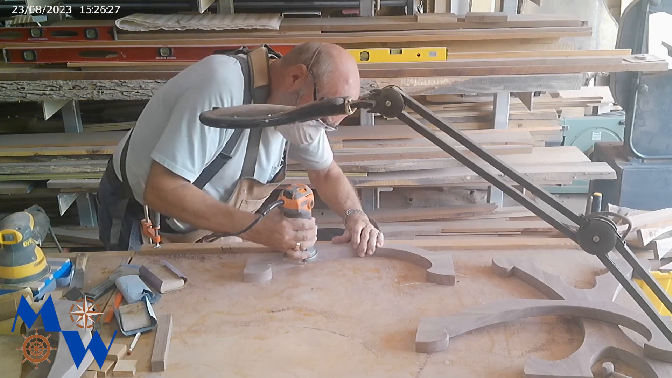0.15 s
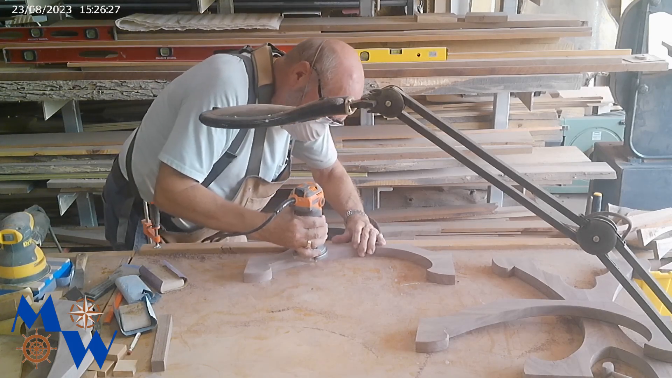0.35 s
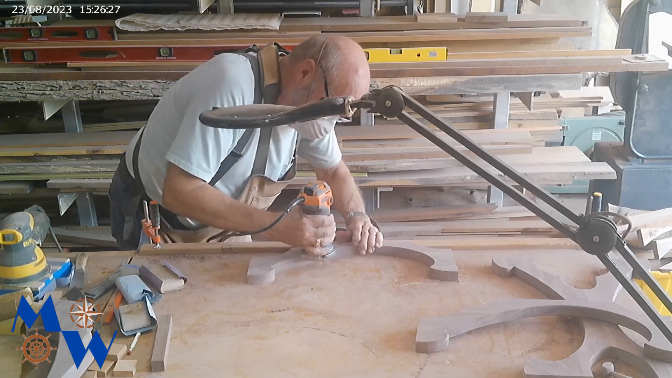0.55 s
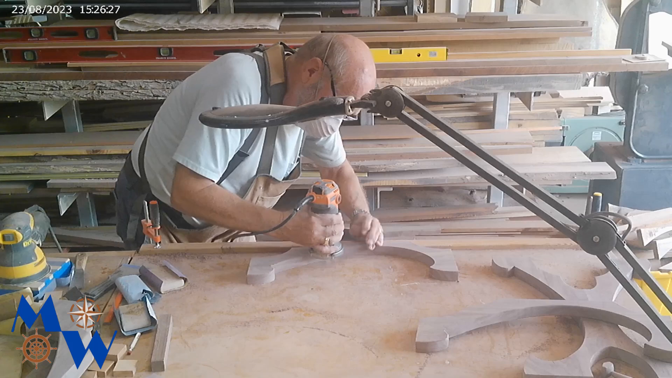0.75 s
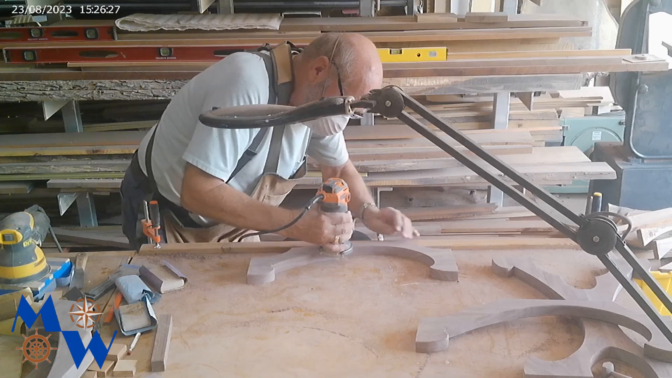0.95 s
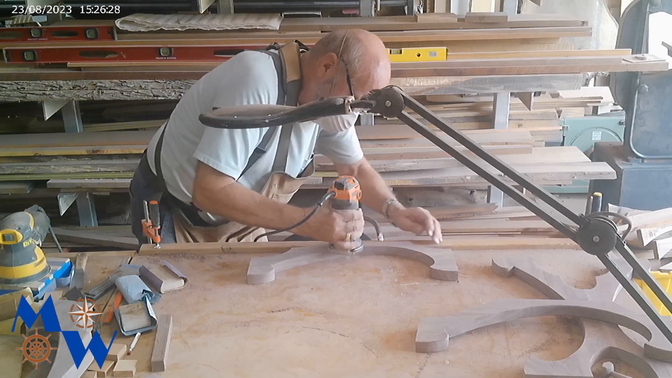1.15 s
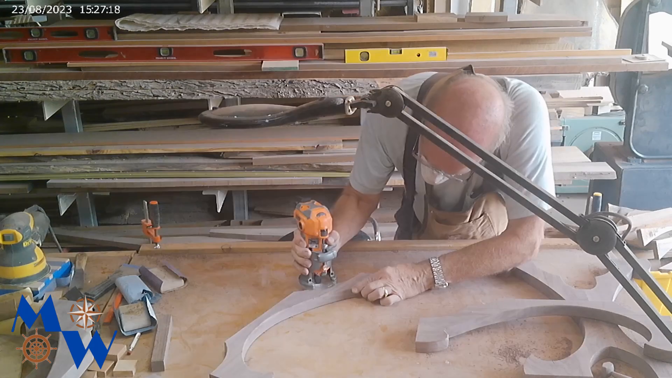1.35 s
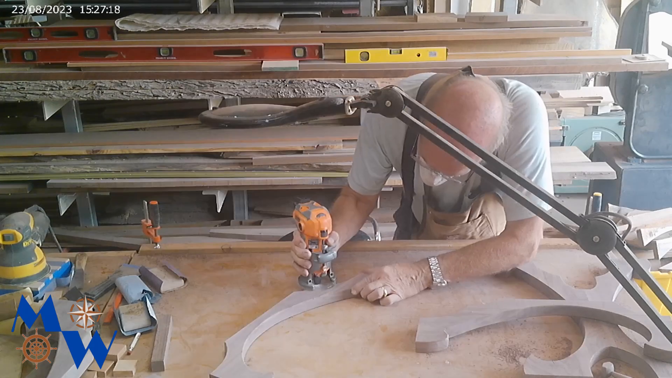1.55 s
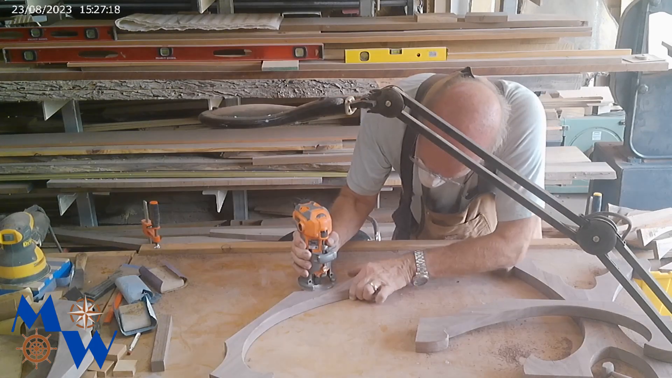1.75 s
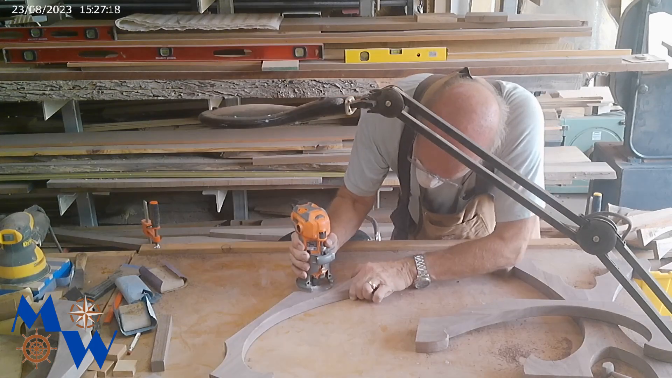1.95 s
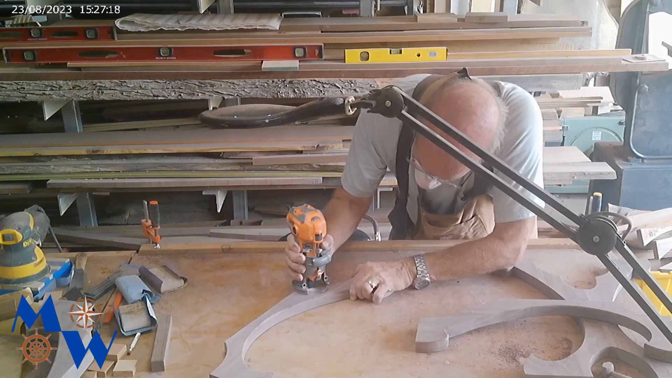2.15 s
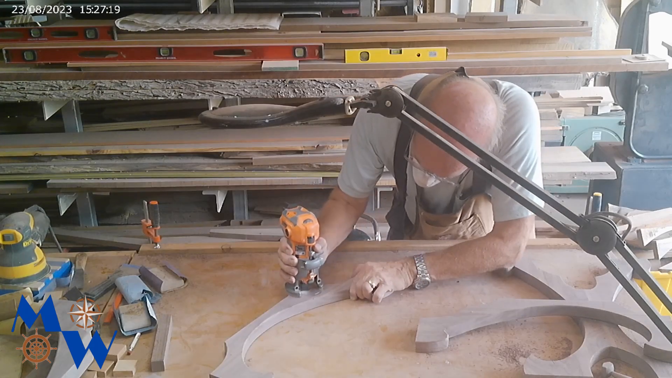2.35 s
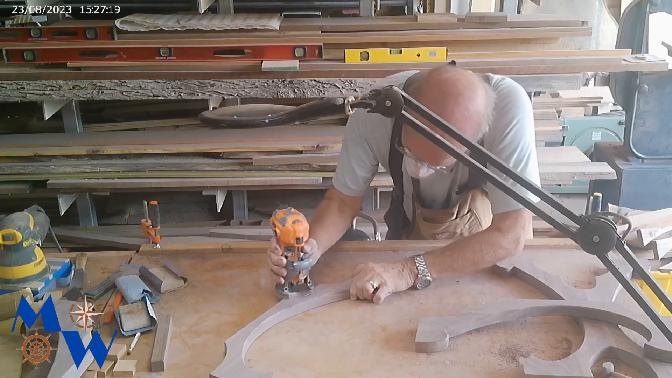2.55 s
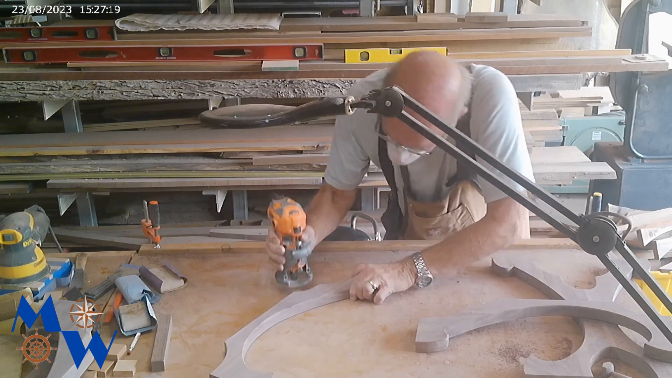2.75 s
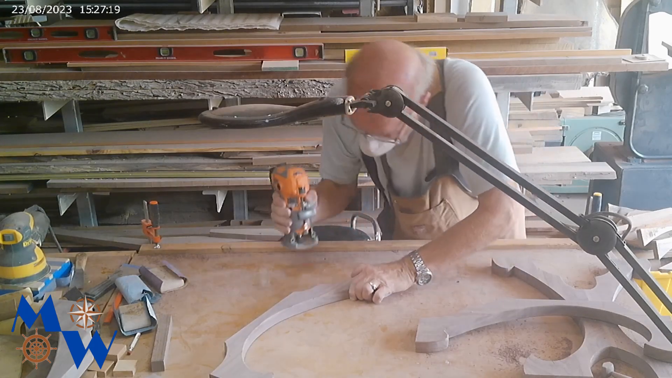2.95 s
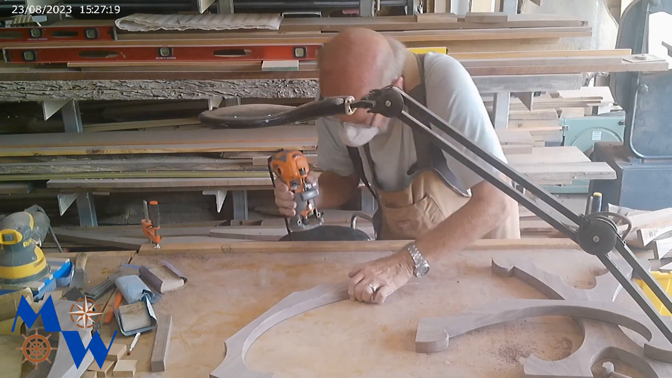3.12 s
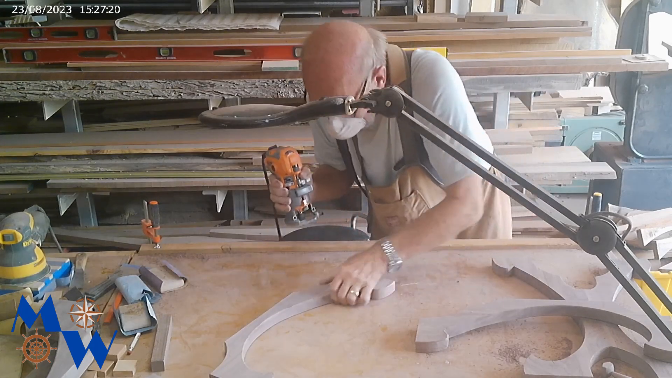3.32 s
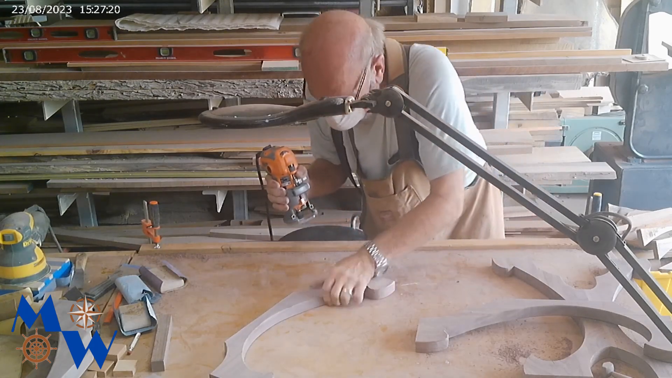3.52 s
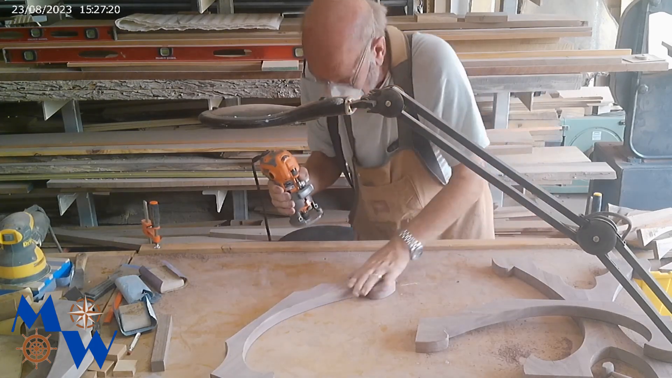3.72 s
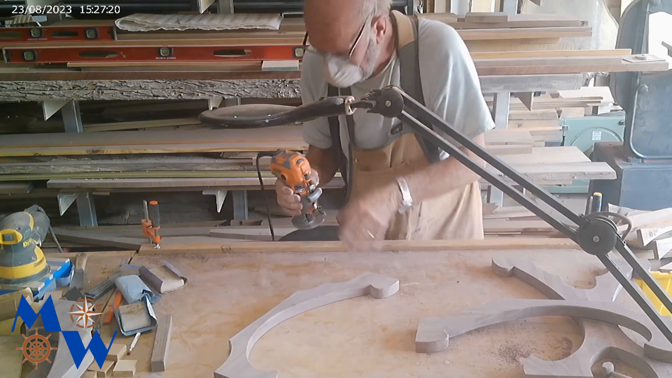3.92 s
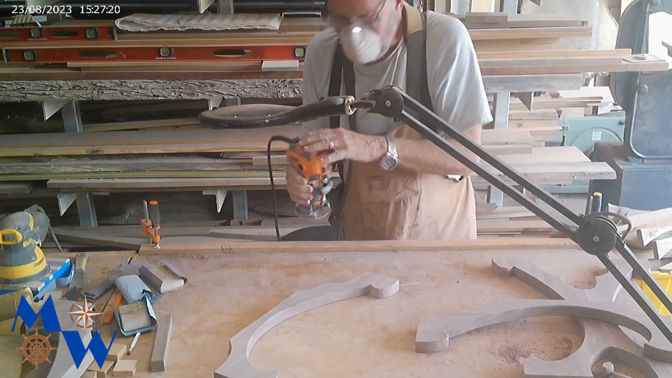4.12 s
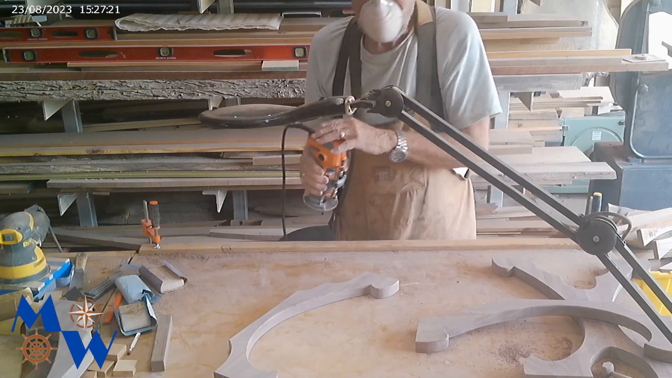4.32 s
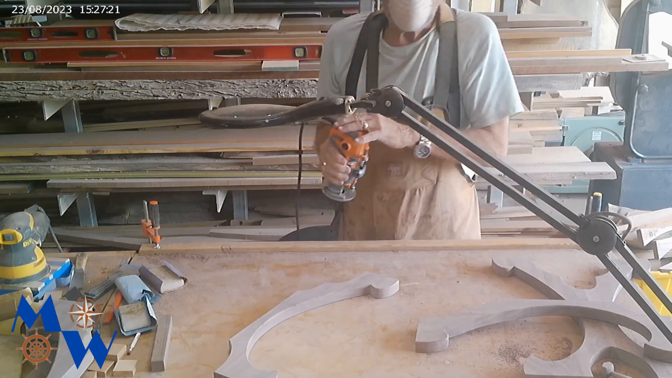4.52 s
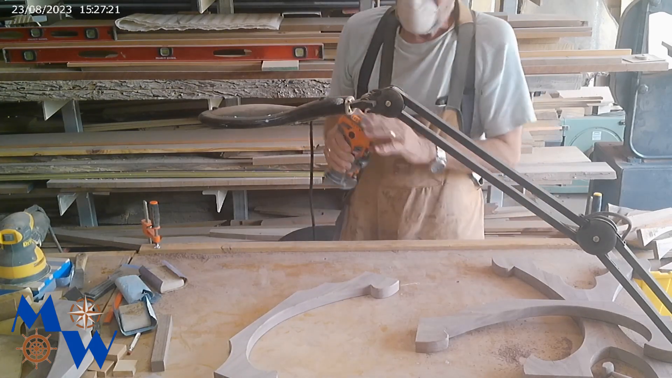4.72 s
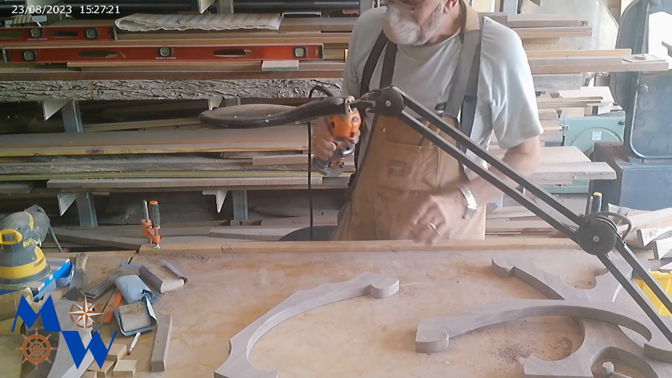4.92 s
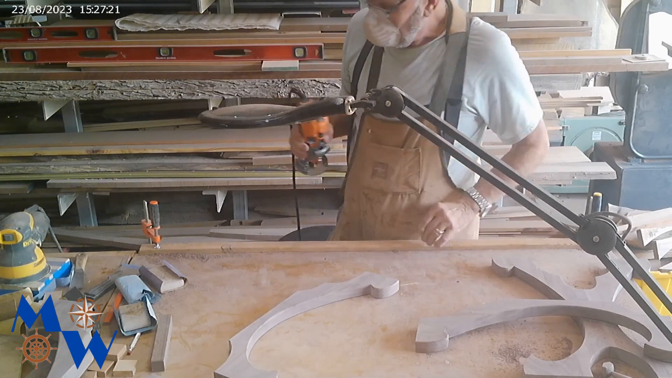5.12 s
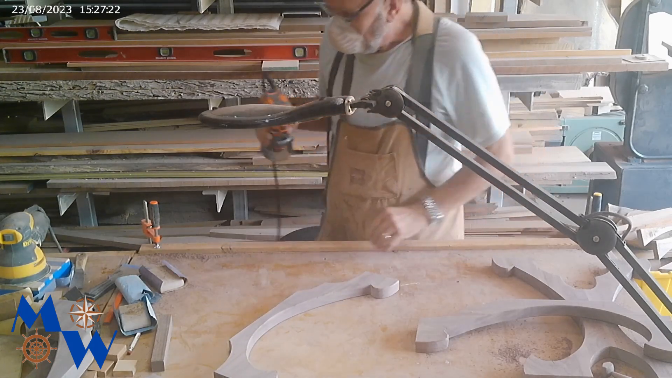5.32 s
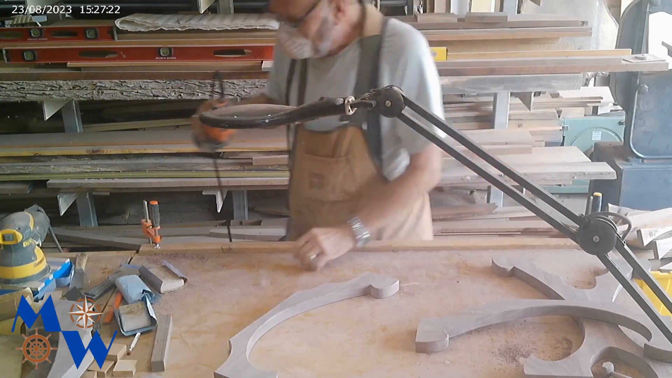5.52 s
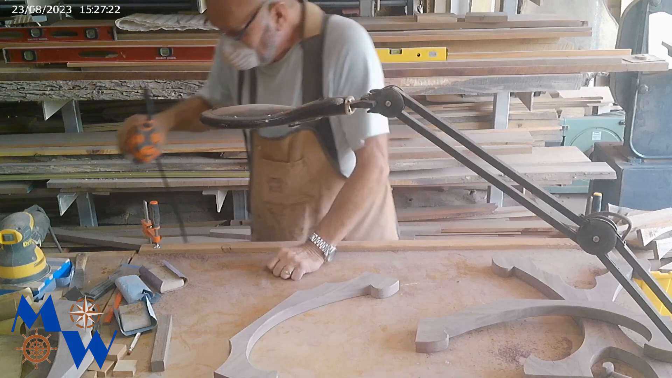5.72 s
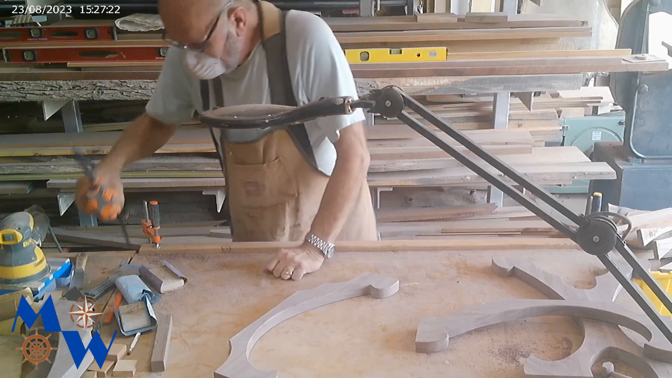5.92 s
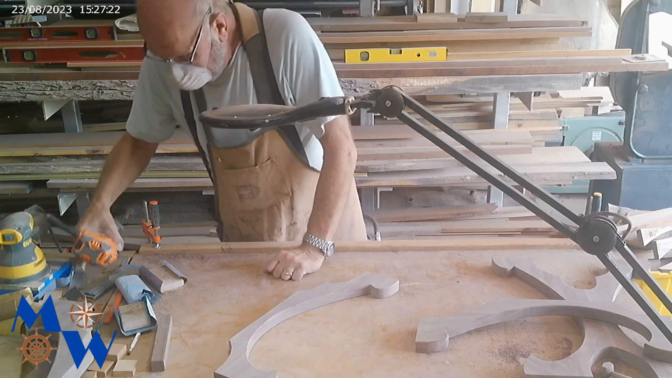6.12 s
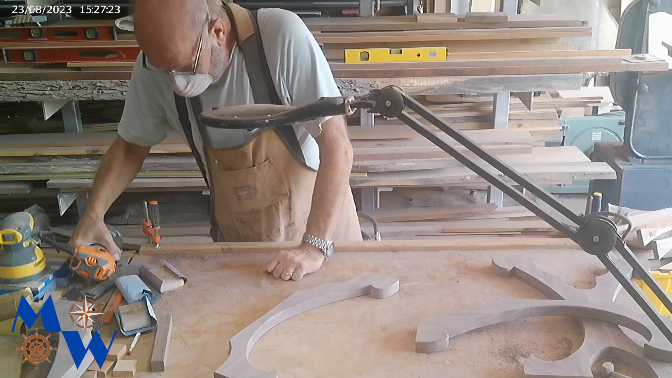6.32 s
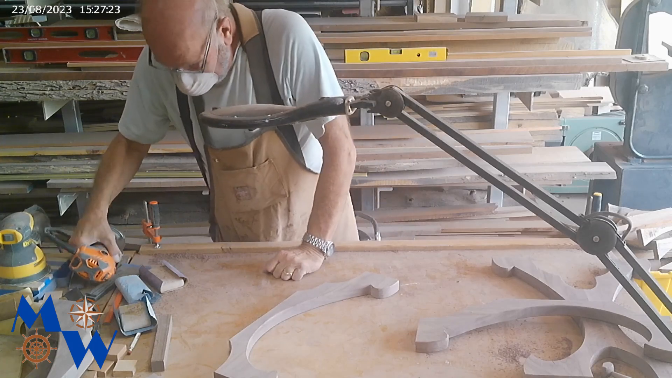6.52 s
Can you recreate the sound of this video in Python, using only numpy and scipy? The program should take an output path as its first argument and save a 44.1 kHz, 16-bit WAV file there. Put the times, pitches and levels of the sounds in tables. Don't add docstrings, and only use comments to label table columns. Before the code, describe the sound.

Close recording in a lightly echoing workshop: a handheld router bites a wooden edge with buzzing, wavering tones over broad airy hiss. After a sudden cut it hovers, bites again and sags slightly in pitch, then comes off the wood into a cleaner fluctuating whistle. Power goes off, the motor coasts downward with dry brush chatter, and the tool bumps down. The treble is slightly grainy.

```python
import sys
import numpy as np
from scipy import signal
from scipy.fft import rfft, irfft, next_fast_len
from scipy.io import wavfile
from scipy.ndimage import uniform_filter1d, map_coordinates

SR = 44100
rng = np.random.default_rng(int(sys.argv[2]) if len(sys.argv) > 2 else 0)


def how_loud(loudness_db):
    steps = np.asarray(loudness_db, float) / 20
    return 10 ** steps


def master(y):
    cut = np.clip(np.atleast_2d(y).T, -1, 1)
    pcm = np.round(cut * 32767)
    wavfile.write(sys.argv[1], SR, pcm.astype(np.int16))


N = 294140
CHANGE_S, CLEAR_S = 1.254, 2.645

# pitch_hz, level_db
GARAGE = [(12, -29), (20, -2), (70, 3.5), (109, 0.5), (168, -14.5), (219, -8), (272, -21), (431, -10.5),
          (729, -26), (800, -3), (1040, -21.5), (1760, -120)]
# pitch_hz, level_db
HISS = [(3000, -38.5), (7500, -3), (10000, 4), (12500, -9), (15800, -4)]
# pitch_hz, ring_s (time to fall 60 dB)
WALLS = [(200, 0.81), (2000, 0.43), (10000, 0.15)]
# pitch_hz, step_db
COARSE = [(300, -4), (3500, 3), (4600, 5), (5500, 5), (6900, 9), (7800, 13), (8800, 13.5), (9150, 17),
          (9600, 12), (11000, 12.5), (12300, 13), (12700, 15.5), (13500, 15), (14400, 15.5), (14800, 17.5),
          (15200, 17.5), (15500, 14)]

# start_s, level_db, upper_share
KNOCKS = [
    (.499, -32, 0.99),
    (0.547, -34, 0.36),
    (6.575, -41, 1.1),
    (6.646, -37, 0.77),
]
# pitch_hz, ring_s (time to fall 60 dB)
FRAME = [(62, .16), (105, 0.12)]
# start_s, length_s, thud_db, buzz_db
PRESSES = [(0.497, 0.025, -67, -38), (0.525, 0.14, -62, -54), (1.58, 0.14, -67, -55),
           (1.765, 0.72, -65.5, -53), (2.15, 0.28, -81, -53), (2.502, 0.09, -75, -49),
           (3.776, 0.096, -54.5, -54.5), (5.922, 0.059, -65, -67), (6.102, 0.028, -52, -52),
           (6.133, 0.042, -55.5, -54.5), (6.355, 0.12, -52, -49.5), (6.482, 0.069, -55, -55.5),
           (6.56, 0.07, -49, -47.5), (6.638, .06, -50, -50)]
# pitch_hz, level_db
THUD = [(25, -34), (45, 20.5), (70, 2), (110, 10.5), (160, -17), (250, -39), (2000, -120)]
# pitch_hz, level_db
BUZZ = [(100, -61), (150, -6), (230, -2), (330, -4), (450, -6), (800, -15), (1500, -64), (4000, -120)]

# time_s, turns_hz
SPEED = [(0, 456.8), (.21, 455.6), (.63, 454.2), (1.04, 453.3), (1.253, 454.4), (1.255, 461.5),
         (1.45, 463.2), (1.65, 463.3), (1.85, 460.6), (2.45, 453.2), (2.62, 453), (2.85, 459.7),
         (3.05, 461.9), (3.25, 463.1), (3.65, 464.1), (4.47, 464)]
# start_s, changeover_s
STANCES = [
    (0, 0),
    (1.254, .002),
    (1.66, .1),
    (2.62, .04),
    (2.85, .2),
]
HELD = {"shaft": ([-54.5, -39, -49, -42.5, -47], 4.5), "second": ([-44.5, -38, -32, -38, -45.5], 8),
        "bars": ([-52.5, -45, -46, -48.5, -49.5], 0.056), "collet": ([-35, -60, -46, -45, -32], 6.2),
        "base": ([-33.5, -32.5, -31.5, -32, -38], 1.92), "chips": ([-34, -44, -39, -46, -60], 2.7),
        "raised": ([-59, -57, -60, -49.5, -38], 3.3), "housing": ([-26.5, -26, -27, -27, -26.5], 2.52),
        "fan": ([-36, -28, -29, -26.5, -29.5], 2.9), "brush": ([-42, -37, -38, -37, -39], 2.6)}

# pitch_hz, level_db
BASE = [(290, -37.5), (500, -13), (528, -18.5), (739, -7), (946, -1), (1200, 1.5), (1310, 4), (1800, -11.5),
        (2340, -41), (3960, -120)]
# pitch_hz, level_db
HOUSING = [(880, -28), (1380, -14), (1550, -6), (2300, -2.5), (2750, -5), (3110, -5), (3420, -2.5),
           (3850, -10), (4150, -9), (4450, -11.5), (4750, -8.5), (5000, -3), (6370, -5.5), (10800, -120)]
# pitch_hz, level_db
FAN = [(2530, -43), (4300, -3.5), (4500, -20), (4860, -19.5), (5370, -1), (5680, -3.5), (6170, -5),
       (6930, -5), (8180, -19), (9100, -19), (11800, -50.5), (20000, -120)]
# pitch_hz, level_db
BRUSH = [(5350, -60), (9100, -10.5), (9860, 1.5), (10700, -4), (11300, -5.5), (12200, -4), (12500, -13),
         (12900, -12), (13500, -10.5), (14300, -12.5), (14650, -16), (15050, -17), (15400, -14),
         (15700, -8)]
# pitch_hz, level_db
COLLET = [(1300, -37.5), (1800, -6.5), (2100, 1), (2450, 2.5), (2800, -11), (3100, -20), (3450, -9),
          (3800, -28.5), (4500, -46)]
# time_s, level_db
OPENING = [(2.8, -1.5), (3.02, 1.5), (3.2, 1), (3.5, 1.5), (3.85, -1), (3.95, -3), (4.25, -11.5),
           (4.4, -3.5), (4.6, 2.5), (5.1, -9.5), (5.55, 14), (5.7, -5)]
# pitch_hz, level_db
RAISED = [(700, -37.5), (950, -11), (1110, 2), (1230, -5), (1370, -17.5), (1550, -5.5), (1680, -3.5),
          (1850, -1), (2000, -8.5), (2600, -39.5)]
# pitch_hz, level_db
CHIPS = [(900, -39.5), (1300, -10), (1500, 0), (1700, -5.5), (2300, -40)]
# time_s, level_db
HOLLOW = [(4.6, -50), (5, -43.5), (5.3, -45.5), (5.6, -44), (5.85, -48), (5.97, -55), (6.1, -53.5),
          (6.35, -56), (6.67, -66)]
# pitch_hz, level_db
CAVITY = [(400, -39), (620, -13), (780, -15), (860, 4.5), (930, -2.5), (1000, -0.5), (1150, -7),
          (1600, -54)]
# pitch_hz, width_hz, middle_s, length_s, level_db
POISED = [
    (1693, 34, 1.6, 0.86, -40),
    (2070, 46, 4.2, 0.65, -38),
    (1290, 38, 1.6, 0.088, -35),
    (860, 28, 5.93, 0.98, -57.5),
    (1000, 23, 6.2, 0.4, -59),
]

# time_s, level_db
COAST = [(4.4, -70), (4.85, -47), (5.1, -45), (5.4, -52), (5.8, -48), (6.2, -48.5), (6.67, -48.5)]
PROUD_DB = {24: -20, 29: -6, 39: 5, 17: 4, 19: 4, 26: 5, 31: 4, 33: 4, 36: 4, 43: 5, 48: 5}
# pitch_hz, level_db
COWL = [(1200, -39), (2500, -10), (3700, -7), (4250, 0), (4900, -7), (5800, 1), (7200, -10), (8500, -16),
        (10000, -10), (12000, -18), (15000, -35)]
# multiple, middle_s, length_s, level_db
SQUEAL = [(16, 5.02, .16, -38), (17, 5.82, .12, -53), (18, 6.1, .06, -55), (12, 5.1, .2, -46),
          (24, 5.87, .13, -49), (24, 6.04, .15, -57), (24, 6.18, .09, -45), (24, 6.28, .14, -53),
          (24, 6.48, .15, -52.5), (24, 6.63, .12, -57), (29, 5.9, .16, -55), (29, 6.13, .2, -54),
          (29, 6.42, .09, -51), (31, 6.48, .09, -54), (33, 6.05, .05, -56), (35, 6.61, .11, -52.5),
          (26, 5.98, .1, -55), (21, 5.62, .12, -51), (39, 6.35, .2, -59), (42, 6.46, .08, -57)]

# time_s, level_db
BITE = [(0, 6), (.3, -0.5), (.6, 4), (.9, 5.5), (1.1, -1), (1.253, 10), (1.255, -17), (1.6, -22), (1.7, -5),
        (2, 2.5), (2.3, 5), (2.6, 1.5), (2.67, -5), (2.75, -75), (6.67, -37)]
# multiple, level_db
CUTTER = [(1, -11), (2, -7), (3, -14.5), (4, -5.5), (5, -11), (6, -8), (7, 0), (8, 2), (9, -6), (10, -8),
          (11, -13.5), (12, -6), (13, -3), (14, -10), (15, -11), (16, -19.5), (17, -80), (18, -27),
          (19, -29.5), (20, -53), (21, -27), (22, -23.5), (23, -66), (24, -26), (25, -30), (26, -41),
          (27, -44.5)]
SWELLS = {1: [(0, 0.096, -31.5), (.12, 0.21, -31.5), (.42, 0.06, -45), (.475, .05, -41), (.61, 0.075, -37),
          (.72, 0.093, -43.5), (.9, 0.17, -45.5), (1.08, 0.15, -37.5), (1.22, 0.17, -35.5),
          (1.42, 0.046, -38.5), (2.05, 0.32, -25), (2.27, 0.39, -19.5), (2.54, 0.23, -29),
          (1.72, 0.017, -36)], 2: [(.22, 0.39, -28.5), (.7, 0.42, -32.5), (1.14, 0.19, -31),
          (2.08, 0.16, -36.5), (2.42, 0.14, -48), (2.56, 0.063, -33.5)], 3: [(.16, 0.14, -40),
          (.39, 0.33, -33), (1.03, 0.53, -39), (1.77, 0.18, -31), (2.22, 0.45, -35)], 4: [(.26, 0.4, -31.5),
          (.05, 0.1, -38), (.91, 0.21, -34), (1.12, 0.12, -32.5), (1.78, 0.14, -35.5), (1.98, 0.2, -32.5),
          (2.48, 0.22, -38)], 5: [(.05, 0.22, -37), (.3, 0.39, -29), (.75, 0.18, -38), (1.1, 0.094, -35),
          (1.76, 0.22, -32), (2.05, 0.24, -44), (2.36, 0.32, -30.5), (2.56, 0.062, -44)],
          6: [(.02, 0.12, -29), (.3, 0.15, -22.5), (.44, 0.054, -33), (.53, 0.043, -20.5), (.62, 0.19, -20),
          (.85, 0.16, -28), (.99, 0.093, -30), (1.64, 0.15, -37), (1.95, 0.23, -32), (2.2, 0.17, -30),
          (2.46, 0.11, -25.5), (2.58, 0.075, -17.5)]}
HIGH_SWELLS = {7: [(.14, 0.25, -35), (.5, 0.32, -37), (.74, 0.077, -35.5), (.95, 0.069, -39.5),
               (1.12, 0.12, -30.5), (2.0, 0.19, -44), (2.5, 0.2, -41)], 8: [(.01, 0.049, -29),
               (.33, 0.14, -33), (.55, .2, -43), (.93, 0.23, -36), (1.15, 0.2, -31.5), (2.03, 0.25, -44),
               (2.41, 0.08, -43)], 9: [(.1, 0.17, -34), (.44, 0.22, -36.5), (.87, 0.17, -38),
               (1.18, 0.22, -34), (1.62, 0.15, -33.5), (2.1, 0.23, -41), (2.38, 0.11, -39),
               (2.55, 0.13, -42)], 10: [(.28, 0.17, -32), (.52, 0.093, -31.5), (1.14, 0.13, -35),
               (2.14, 0.27, -46), (2.56, 0.13, -38)], 13: [(.36, 0.2, -36), (.65, 0.18, -41),
               (1.1, 0.24, -41), (1.78, 0.16, -46), (2.56, .12, -37)], 14: [(.3, 0.19, -34),
               (.72, 0.14, -39), (1.1, 0.15, -30)]}
SWUNG = {8: [(2.7, 0.15, -34.5)], 4: [(2.69, 0.13, -36), (3.6, 0.37, -46), (3.85, .15, -40.5)],
         1: [(2.72, 0.035, -45.5), (4.6, 0.056, -48), (4.73, 0.07, -51), (4.93, 0.11, -51.5),
         (5.25, 0.39, -68)], 2: [(4.68, 0.27, -48), (4.85, 0.18, -51), (5.15, 0.21, -53.5),
         (5.36, 0.083, -58), (5.73, 0.1, -62), (5.92, 0.099, -63)]}

# multiple, level_db
MOTOR = [(9, -4), (10, -4), (13, -1), (14, -7)]
MAIN_LINES = (1, 2, 12, 24)
FLUTTER_DB = (.6, 1.4, 1.6, 4.5)
# time_s,
# level_db
VENT = [(0, -35), (.2, -29), (.3, -34), (.45, -35), (.62, -30.5), (.8, -27), (.92, -29.5), (1.02, -28),
        (1.2, -31), (1.3, -40.5), (1.45, -32), (1.75, -30.5), (1.9, -45), (1.97, -43), (2.06, -29),
        (2.25, -38), (2.4, -37), (2.47, -26.5),
        (2.62, -31), (2.72, -29), (2.86, -25), (2.92, -46), (2.97, -38), (3.005, -21.5),
               (3.045, -33), (3.083, -20), (3.14, -31), (3.19, -24), (3.26, -21), (3.33, -25),
        (3.45, -25), (3.56, -25.5), (3.64, -22.5), (3.69, -25.5), (3.75, -21.5), (3.9, -24.5),
             (3.98, -22.5), (4.1, -23), (4.2, -26.5), (4.3, -36), (4.388, -44), (4.45, -26.5), (4.519, -25),
             (4.7, -26)]
# pitch_hz, level_db
WHISTLE = [(1300, -48), (2100, -36), (2600, -26), (3000, -23), (3300, -24), (3700, -24), (4100, -21),
           (4500, -25), (4950, -4), (5560, 0)]
# pitch_hz, level_db
BARS = [(2600, -30), (6000, -30), (6500, -6), (7500, -12), (9500, -10), (11100, 0)]


def unit(x):
    return x / np.sqrt(np.mean(x ** 2) + 1e-20)


def clock():
    return np.arange(N) / SR


def along(points, hz):
    pitch_hz, value = np.transpose(points)
    return np.interp(np.log(hz + 1), np.log(pitch_hz + 1), value)


def curve(rows):
    time_s, value = np.transpose(rows)
    return np.interp(clock(), time_s, value)


def wobble(rate):
    coarse = np.arange(0, N + 64, 64)
    knots = rng.standard_normal(int(N * 80 / SR) + 4)
    smooth = map_coordinates(knots, [coarse * min(rate, 79) / SR])
    return np.interp(np.arange(N), coarse, smooth)


def coloured(x, spectrum):
    size = next_fast_len(N + 8192)
    gain = how_loud(along(spectrum, np.fft.rfftfreq(size, 1 / SR)))
    return unit(irfft(rfft(x, size) * gain, size)[:N])


def rush(spectrum, patchy_db):
    z = signal.stft(rng.standard_normal(N + 512), nperseg=512)[2]
    patches = uniform_filter1d(rng.standard_normal(z.shape), size=5, axis=0)
    patches = uniform_filter1d(patches, size=12, axis=1)
    noise = signal.istft(z * how_loud(patchy_db * unit(patches)), nperseg=512)[1][:N]
    return coloured(noise, spectrum)


def breath(db, waver_db, rate, spectrum, patchy_db):
    return how_loud(db + waver_db * wobble(rate)) * rush(spectrum, patchy_db)


def narrow(angle, width_hz):
    size = max(round(SR / width_hz), 2)
    slow = uniform_filter1d(rng.standard_normal((2, N)), size=size, axis=1)
    a, b = uniform_filter1d(slow, size=size, axis=1)
    return unit(a * np.sin(angle) + b * np.cos(angle))


def line(turn, multiple, db, waver_db, rate):
    start_angle = rng.uniform(0, 2 * np.pi)
    return np.sqrt(2) * how_loud(db + waver_db * wobble(rate)) * np.sin(multiple * turn + start_angle)


def speed():
    friction_hz_per_s, drag_per_turn = 136, 3e-4
    off_s, free_hz = SPEED[-1]
    t = clock()
    even_hz = np.sqrt(friction_hz_per_s / drag_per_turn)
    angle = np.arctan(free_hz / even_hz) - even_hz * drag_per_turn * (t - off_s).clip(0)
    return np.where(t > off_s, even_hz * np.tan(angle), curve(SPEED))


def held(voice, hz):
    levels, loss = HELD[voice]
    rows = []
    for k, (start_s, changeover_s) in enumerate(STANCES):
        rows.append((start_s, levels[max(k - 1, 0)]))
        rows.append((start_s + changeover_s, levels[k]))
    return curve(rows) + loss * 20 * np.log10(hz / hz.max())


def bells(rows):
    t, total = clock(), np.zeros(N)
    for middle_s, length_s, db in rows:
        same_scene = (t > CHANGE_S) == (middle_s > CHANGE_S)
        total += how_loud(db) * 2 ** (-(2 * (t - middle_s) / length_s) ** 2) * same_scene
    return total


def swollen(multiple, db):
    in_wood = np.clip((CLEAR_S - clock()) / .04, 0, 1)
    cutting = bells({**SWELLS, **HIGH_SWELLS}[multiple]) * in_wood
    return 20 * np.log10(how_loud(db) + cutting + bells(SWUNG.get(multiple, [])))


def quiet_garage():
    return how_loud(-53) * rush(GARAGE, patchy_db=3.0) + how_loud(-65.5) * rush(HISS, patchy_db=-0.5)


def walls(x):
    hz, t, z = signal.stft(rng.standard_normal(SR // 2), SR, nperseg=256)
    fade = how_loud(-60 * t / along(WALLS, hz)[:, None])
    tail = signal.istft(z * fade, SR, nperseg=256)[1]
    late = np.pad(x, (400, 0))
    return signal.fftconvolve(late, tail / np.linalg.norm(tail))[:N]


def knocks():
    t, total = clock(), np.zeros(N)
    for start_s, db, upper_share in KNOCKS:
        age = (t - start_s).clip(0)
        onset = 1 - np.exp(-age / 0.0023)
        for (hz, ring_s), share in zip(FRAME, (.8, upper_share)):
            total += how_loud(db - 60 * age / ring_s) * share * np.sin(2 * np.pi * hz * age) * onset
    return total


def bench():
    t, thud, buzz = clock(), np.zeros(N), np.zeros(N)
    for start_s, length_s, thud_db, buzz_db in PRESSES:
        inside_s = np.minimum(t - start_s, start_s + length_s - t)
        press = np.clip(inside_s / 0.024 + .5, 0, 1)
        thud += how_loud(thud_db) * press
        buzz += how_loud(buzz_db) * press
    lumps = how_loud(1.2 * wobble(75)) * rng.standard_normal(N)
    return thud * coloured(lumps, THUD) + buzz * coloured(lumps, BUZZ)


def gap():
    t, total = clock(), np.zeros(N)
    for hz, width_hz, middle_s, length_s, db in POISED:
        level_db = db - 9.2 * (2 * (t - middle_s) / length_s) ** 2
        total += how_loud(level_db) * narrow(2 * np.pi * hz * t, width_hz)
    return total


def air(turn, hz):
    t = clock()
    fan_db = held("fan", hz) + 2.5 * t * (t < CHANGE_S)
    collet_db = held("collet", hz) + curve(OPENING)
    low = breath(held("base", hz), 0.34, 2.3, BASE, patchy_db=1.5)
    low = low + breath(held("housing", hz), 0.92, 4, HOUSING, patchy_db=1.0)
    high = breath(fan_db, 0.46, 14, FAN, patchy_db=2.0)
    high = high + breath(held("brush", hz), 0.22, 20.0, BRUSH, patchy_db=2.5)
    collet = breath(collet_db, 0.87, 7.6, COLLET, patchy_db=2.5)
    raised = breath(held("raised", hz), 0.69, 3, RAISED, patchy_db=3.0)
    chips = breath(held("chips", hz), 1.1, 5, CHIPS, patchy_db=2.5)
    hollow = breath(curve(HOLLOW), 0.29, 30, CAVITY, patchy_db=2.5)
    throb = 1 + 0.079 * np.sin(turn)
    return throb * (low + high + collet + raised + chips) + hollow


def brushes(turn):
    angle = np.linspace(0, 2 * np.pi, 2048)
    bars = np.zeros(len(angle))
    for k in range(16, 90):
        strength = how_loud(PROUD_DB.get(k, 0) + 2.3 * rng.standard_normal())
        bars += strength * np.sin(k * angle + rng.uniform(0, 2 * np.pi))
    trace = np.interp(turn % (2 * np.pi), angle, bars) * (clock() > COAST[0][0])
    return how_loud(curve(COAST) + 1.6 * wobble(30)) * coloured(trace, COWL)


def squeal(turn):
    t, total = clock(), np.zeros(N)
    rough_db = 2.5 * wobble(70)
    shaky = turn + .025 * wobble(75)
    for k, middle_s, length_s, db in SQUEAL:
        level_db = rough_db + db - 4.3 * (2 * (t - middle_s) / length_s) ** 2
        total += np.sqrt(2) * how_loud(level_db) * np.sin(k * shaky + 9 * middle_s)
    return total


def cutter(turn):
    bite_db, total = curve(BITE), np.zeros(N)
    for k, db in CUTTER:
        if k in MAIN_LINES:
            continue
        if k in SWELLS or k in HIGH_SWELLS:
            steady_db = db - 36.5 - 9.5 + bite_db
            total += line(turn, k, swollen(k, steady_db), waver_db=1.5, rate=22)
        else:
            total += line(turn, k, db - 32.0 + bite_db, waver_db=4.5, rate=10)
    return total


def motor(turn, hz):
    speed_db = 20 * np.log10(hz / hz.max())
    return sum(line(turn, k, db - 49.5 + 8 * speed_db, waver_db=3.5, rate=8) for k, db in MOTOR)


def whine(turn, hz):
    slow_db = np.clip((hz - 460) * .3, -16, 0)
    shaft_db = swollen(1, held("shaft", hz) + slow_db)
    second_db = swollen(2, held("second", hz) + slow_db)
    fan_db = curve(VENT) + along(WHISTLE, MAIN_LINES[2] * hz)
    bars_db = held("bars", hz) + along(BARS, MAIN_LINES[3] * hz)
    levels = [shaft_db, second_db, fan_db, bars_db]
    strong = sum(line(turn, k, db, waver_db, rate=75)
                 for k, db, waver_db in zip(MAIN_LINES, levels, FLUTTER_DB))
    strong = strong + how_loud(fan_db - 12.5) * narrow(MAIN_LINES[2] * turn, width_hz=162)
    coasting = np.clip((400 - hz) / 30, 0, 1)
    swing_db = (3 * wobble(12) + 2 * wobble(50)) * coasting
    return strong * how_loud(swing_db)


def scene():
    hz = speed()
    turn = 2 * np.pi * np.cumsum(hz * (1 + 0.000808 * wobble(29.92))) / SR
    turn = turn + 2.4 * (clock() > CHANGE_S)
    tones = whine(turn, hz) + motor(turn, hz) + squeal(turn) + cutter(turn)
    ticks = brushes(turn)
    direct = tones + 0.46 * ticks
    echoes = how_loud(-18.0) * walls(tones) + 0.37 * walls(ticks)
    mix = quiet_garage() + echoes + knocks() + bench() + gap() + air(turn, hz) + direct
    return mix[None]


def coarse_steps(x, size=1024):
    n, k = np.arange(2 * size), np.arange(size)
    window = np.sin(np.pi * (n + .5) / (2 * size))
    waves = np.cos(np.pi / size * np.outer(k + .5, n + .5 + size / 2))
    basis = window * waves * np.sqrt(2 / size)
    blocks = np.pad(x, (size, 2 * size - N % size), "reflect").reshape(-1, size)
    lines = np.hstack([blocks[:-1], blocks[1:]]) @ basis.T
    hz = (k + .5) * SR / (2 * size)
    nearby = uniform_filter1d(np.log(lines ** 2 + 1e-14), size=70, axis=1)
    nearby = uniform_filter1d(nearby, size=7, axis=0)
    step = np.exp(nearby / 2) * how_loud(along(COARSE, hz))
    lines = lines * (hz < 15720)
    rounded = np.sign(lines) * np.floor(np.abs(lines) / step + 0.35) * step
    frames = rounded @ basis
    return (frames[:-1, size:] + frames[1:, :size]).ravel()[:N]


def band_limit(x):
    return signal.sosfilt(signal.butter(12, 15940, fs=SR, output="sos"), x)


def record(dry):
    mix = coarse_steps(dry[0])[None]
    return band_limit(mix)


dry = scene()
out = record(dry)
master(out)
```